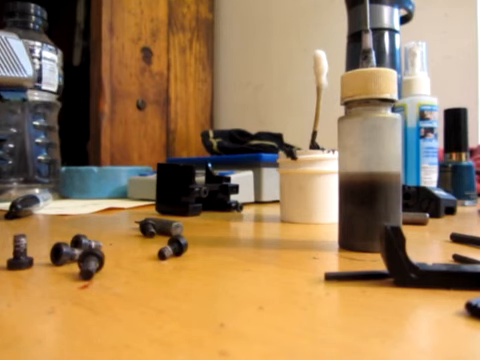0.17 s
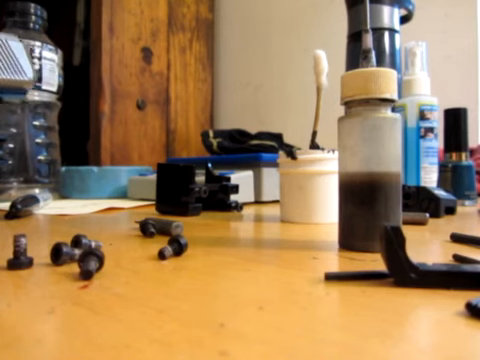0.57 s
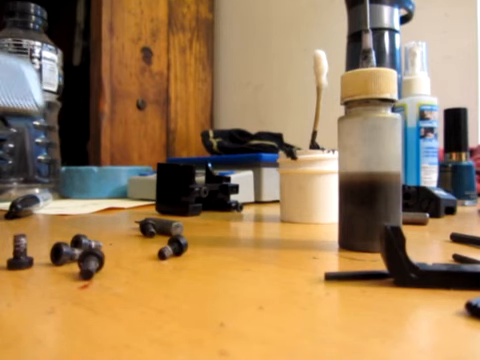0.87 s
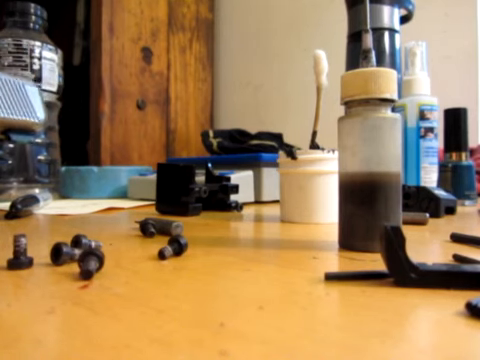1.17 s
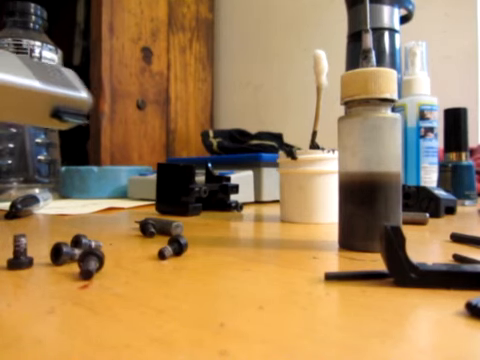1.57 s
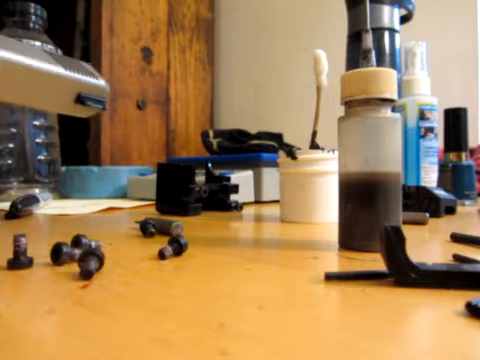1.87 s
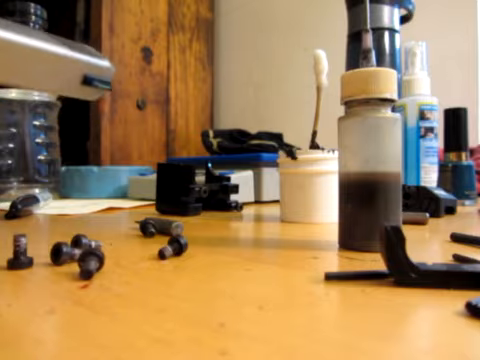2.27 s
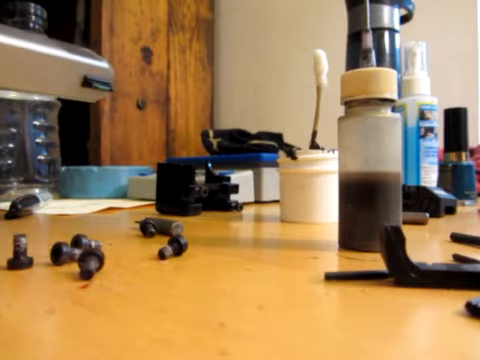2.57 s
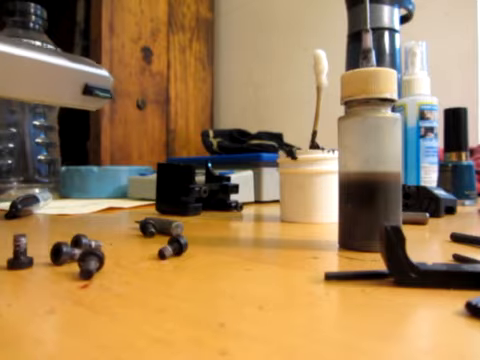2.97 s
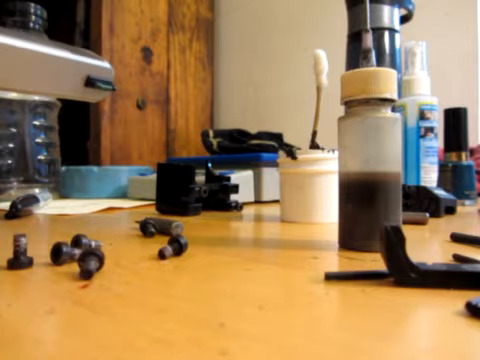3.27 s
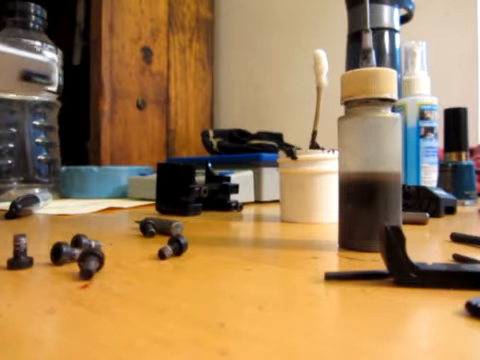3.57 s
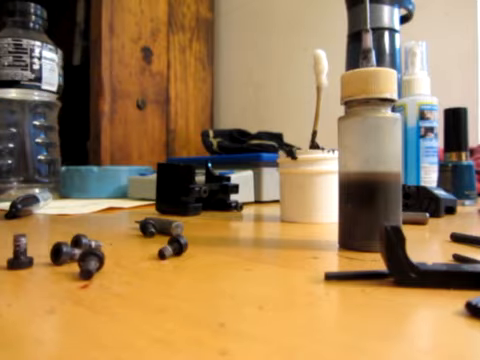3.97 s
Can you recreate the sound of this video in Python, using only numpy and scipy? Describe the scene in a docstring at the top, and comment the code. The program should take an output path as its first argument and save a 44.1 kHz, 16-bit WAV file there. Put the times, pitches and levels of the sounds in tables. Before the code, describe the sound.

Dry, close steel sounds over a wooden workbench: one bright crack, a pause with faint swishes, a hollow knock and fading taps on wood, then muffled bumps to the right. Several mid-pitched clicks follow, some with a brief ring. A sharp clack leads to a grinding slide and a rapid burst of hard clicks. Short room reflections, soft rumble, very faint high whine.

```python
"""Pistol check over a workbench

A pistol is handled over a wooden bench in a small room, close by and left of a pair of microphones.
A catch snaps; steel parts click, slide and clack in a quick run; something knocks and rocks on the bench.
Dull bumps and two swishes come from farther off, over quiet room tone and a faint whine. Bursts of noise
act as contact forces and set resonant objects ringing; reflections and a diffuse tail place them."""
import sys
import numpy as np
from scipy import signal
from scipy.fft import rfft, irfft
from scipy.io import wavfile
from scipy.ndimage import uniform_filter1d

SR = 44100
rng = np.random.default_rng(int(sys.argv[2]) if len(sys.argv) > 2 else 0)


def to_wav(sig):
    """Store sig (one row per channel, or 1-D mono) as 16-bit WAV at the path in sys.argv[1].

    Samples outside -1..1 are clipped; the rate is SR.
    """
    pcm = np.clip(np.atleast_2d(sig), -1, 1) * 32767
    pcm = np.round(pcm).astype(np.int16)
    wavfile.write(sys.argv[1], SR, pcm.T)  # frames by channels


N = 182441  # length of the scene in samples

# Band edges in Hz; a sound with fewer bands merges the upper ones.
BAND_EDGES = [30, 1000, 4000, 8000, 12000, 16000]

# Room tone spectrum. Each row: frequency in Hz, relative level in dB.
ROOM_TONE_COLOUR = [(20, -16), (64, 3.5), (87, -2.5), (118, 0.5), (286, -5), (420, -6.5), (1170, -12),
                    (4100, -25), (5500, -24.5), (9300, -32.5), (10600, -48), (15000, -103)]
# Room tone as the hands move. Each row: time in seconds, level in dB.
ROOM_TONE_LEVEL = [(0, -58.5), (.8, -61), (1.75, -54.5), (2.9, -51), (3.7, -49), (4.14, -61)]
# Decay of the small room. Each row: frequency in Hz, time to fall by 60 dB in seconds.
ROOM_DECAY = [(100, 0.14), (400, 0.25), (1500, 0.33), (5000, 0.3), (10000, 0.27), (16000, 0.041)]
# Paths to the left, then the right microphone, straight and off the bench top.
# Each path: delay in ms, gain as a factor.
MIC_PATHS = [
    [(0, 1.15), (.33, .15)],
    [(.136, .8), (.66, -.12)],
]
# The right microphone's colour for sounds from the left. Each row: frequency in Hz, gain in dB.
RIGHT_COLOUR = [(150, 6.5), (450, -2.5), (1100, -7), (2500, -3.5), (3800, 8.5), (5200, 0.5), (8000, -10),
                (13000, 11)]

# A faint electrical whine. Each row: start in seconds, level at the left microphone in dB.
WHINE_STARTS = [(0.19, -78), (1.12, -78), (2.028, -76.5), (2.96, -71.5), (4.05, -81)]
WHINE_HZ, WHINE_LENGTH_S = 5200, 0.25
WHINE_OCTAVE_DB, WHINE_RIGHT_DB = -15.5, 7.5  # octave against the tone, right against left

# Swishes farther off. Each row: start in seconds, length in seconds, relative level in dB.
SWISHES = [(0.464, 0.065, -51), (0.73, 0.054, -44)]
SWISH_BASS_DB, SWISH_TREBLE_DB, SWISH_AIR_DB = -8.5, -2.5, -3  # against the middle band
# A hollow note in the second swish. Each row: time in seconds, relative level in dB, pitch in Hz.
HOLLOW_CURVE = [(0.734, -41, 760), (0.767, -34.5, 770), (0.795, -66, 760), (0.805, -42, 795),
                (0.827, -59, 770), (0.85, -42, 750)]

# Dull bumps farther off. Each row: start in seconds, relative level in dB, length in seconds,
# fade time in seconds, middle band against the bass in dB, hollow note in Hz.
BUMPS = [(1.848, -28, 0.091, 0.037, -18.5, 600), (2.001, -44.5, 0.033, 0.01, -15, 630),
         (2.082, -33.5, 0.076, 0.047, -16, 550), (3.097, -32, 0.074, 0.034, -11.5, 286),
         (3.212, -26, 0.091, 0.029, -13.5, 580)]
# Broad colour of the bumps. Each row: frequency in Hz, gain in dB.
BUMP_COLOUR = [(60, -57), (150, -18), (245, -2.5), (380, -12), (620, -12.5), (1100, -11.5), (1700, -16.5),
               (4000, -26.5), (8000, -31), (10500, -46.5), (13000, -82)]
BUMP_TREBLE_DB = -28  # against the bass

# Knocks on the bench top. Each row: start in seconds, relative level in dB,
# everything above the bass against the bass in dB, note of the spot in Hz.
KNOCKS = [(1.325, -39, -7, 418), (1.339, -34.5, -21, 640), (1.379, -27, -15.5, 350),
          (1.3849, -22.5, -12.5, 327), (1.4179, -13, -5.5, 686), (1.425, -20, -26, 233),
          (1.4518, -22.5, -7.5, 750), (2.547, -39.5, -11, 456)]
# Broad colour of a blow on the bench. Each row: frequency in Hz, gain in dB.
BENCH_COLOUR = [(40, -17), (100, 0), (160, -4.5), (250, 0), (450, -3), (850, -7.5), (1200, -17.5),
                (3000, -30), (6000, -38), (11000, -62), (15000, -104)]
# Resonances of the bench. Each row: frequency in Hz, width in Hz, relative strength in dB.
BENCH_MODES = [(250, 29, -25), (373, 32, 5.5), (516, 52, -3), (798, 105, 6.5), (1500, 190, 0),
               (1760, 350, 1), (2370, 90, -9)]
KNOCK_LAG_S = 0.0014  # how late 315 Hz arrives after the treble; lower notes lag more
# The knocked thing rocks to rest in even, softer taps, each weaker than the last.
ROCK_START_S, ROCK_PERIOD_S, ROCK_LAG_S = 1.509, 0.0502, 0.00372
ROCK_DB, ROCK_LOSS_DB, ROCK_UPPER_DB = -29, 4, -16.5  # relative level, loss per tap, above 1 kHz against bass
# It drags over the bench just before the main knock.
DRAG_START_S, DRAG_LENGTH_S, DRAG_DB, DRAG_HZ = 1.381, 0.046, -39, 144

# Broad colour of a steel contact. Each row: frequency in Hz, gain in dB.
CONTACT_COLOUR = [(60, -11.5), (200, -11), (450, -0.5), (1000, 1), (1900, 5), (2900, 7), (3900, 1.5),
                  (5800, -3.5), (8000, -8.5), (10700, -19), (12300, -33), (16000, -56)]
# Resonances of the pistol. Each row: frequency in Hz, width in Hz, relative strength in dB.
FRAME_MODES = [(1070, 160, -2), (1690, 35, -2), (1728, 30, 0), (1784, 35, -3), (2025, 55, 1),
               (2129, 40, -3), (2470, 50, -2), (2614, 35, 0), (3071, 45, -2), (3184, 45, -1),
               (5470, 150, 1), (5730, 90, -4), (6680, 200, -4), (8200, 300, -5), (9750, 300, -2),
               (11100, 300, -4)]
# Hard contacts are bright and low-ringing parts carry more bass. Rows for bass, treble, air and the very top.
# Each row: level in dB against the middle band, dB per dB of hardness, dB per octave above MID_PART_HZ.
STEEL_BANDS = [(-1.5, 0.11, -7.5), (-7, 1.52, 2), (-24.5, 1.99, 3), (-44.5, 4.5, 4)]
MID_PART_HZ = 2000
PART_WIDTH = .14  # width of a gripped part's resonance, as a share of its pitch
FREE_DB_PER_OCTAVE = 6  # how much more strongly a part rings, per octave above MID_PART_HZ

# A jolted part rings on. Each row: start in seconds, relative level in dB, tilt of its modes in dB per octave.
PINGS = [(2.004, -47.5, -12), (2.8246, -31.5, -6)]
# Modes of that part. Each row: frequency in Hz, width in Hz, relative strength in dB.
PING_MODES = [(1696, 26, 0), (2552, 55, -3), (2678, 50, -3)]
# Short strokes of steel on steel. Each row: start in seconds, length in seconds, relative level in dB,
# hardness of the contact in dB, ring in Hz.
RUBS = [(0, 0.064, -72.5, 5.5, 3900), (1.106, 0.041, -65.5, 0, 5710), (1.325, 0.032, -57.5, 4, 590),
        (1.392, 0.04, -49.5, -2, 1580), (2.266, 0.072, -65, 3.5, 4600), (2.802, 0.019, -47.5, -20, 2550),
        (3.401, 0.056, -56, 0, 6900), (3.492, 0.034, -51, 2, 1980), (3.741, 0.03, -40, 2, 1470),
        (3.813, 0.066, -36, 5, 1600), (3.871, 0.028, -43.5, 7, 2210)]
# The slide is drawn back. Each row: time in seconds, relative level in dB, hardness in dB, ring in Hz.
SLIDE_CURVE = [(3.545, -49, 8.5, 2700), (3.565, -41, 3, 2870), (3.582, -37.5, 1, 3050),
               (3.617, -53, 6.5, 3100), (3.645, -49, 5, 2600), (3.663, -38, 3.5, 2340),
               (3.7, -41.5, 2.5, 2070), (3.731, -36.5, 5, 2200), (3.764, -41, 6, 1840),
               (3.797, -38, 2.5, 1820)]
# Resonances of the slide's rails. Each row: frequency in Hz, width in Hz, strength in dB.
RAIL_MODES = [(2740, 130, 1), (3360, 110, 5)]
# A sprung catch slips, snaps home and rebounds.
# Each row: start in seconds, relative level in dB, chatter time in ms.
SNAPS = [(0.288, -30.5, 1.3), (0.291, -11.5, 2.1), (0.2936, -17.5, 1.2)]
# Ring of the catch. Each row: frequency in Hz, width in Hz, strength in dB.
CATCH_MODES = [(2900, 100, 3.5), (3800, 200, 1), (6350, 320, 4.5), (9800, 300, 2.5), (10400, 270, 3.5)]
# Broad colour of the snap. Each row: frequency in Hz, gain in dB.
SNAP_COLOUR = [(60, -12.5), (200, -11), (700, -6.5), (1100, -2), (2200, -4), (3500, 2.5), (6500, 2),
               (8200, 1), (10000, -3.5), (12500, -4.5), (16000, -24)]
SNAP_RISE_S = 0.0004
# Steel meeting steel. Each row: time in seconds, relative level in dB, hardness of the contact in dB,
# ring of the struck part in Hz, chatter time in ms, extra bass weight in dB, relative strength of the ring in dB.
CLICKS = [(0.389, -37, 1.5, 4230, 3, -22, 1), (1.386, -35.5, -3, 1580, 1.1, 8, 14),
          (2.4642, -33.5, 0.5, 4730, 5.1, 12.5, 5), (2.6284, -21.5, 0, 2660, 2.5, 2.5, -5),
          (2.634, -24, -3, 1740, 2.3, -3, 2), (2.6384, -19.5, -2, 2500, 0.48, -7, -2),
          (2.818, -32.5, -8, 2600, 1.1, -1, -2), (2.8237, -22.5, -8.5, 2600, 1.1, -1.5, 6),
          (2.952, -41, 1.5, 596, 0.75, -2.5, 16), (2.9881, -20.5, 3, 1000, 3.3, -1, 2.5),
          (2.993, -25.5, -7, 1560, 3.3, -6, 7), (3.054, -30, -15, 2700, 1.2, 3, -19),
          (3.4788, -18.5, 4, 1880, 0.83, -0.5, -2.5), (3.516, -30, 0, 2680, 4, -2, -3),
          (3.5288, -14.5, -2, 2680, 1.74, -2, -7), (3.6614, -20, -3, 2400, 3, -3.5, 2),
          (3.669, -25.5, 3, 2250, 1.6, -15, 17), (3.712, -33.5, 7.5, 4400, 1.2, 2.5, -12),
          (3.7644, -28.5, -15, 1720, 1.5, 11.5, -1), (3.7699, -25, -12, 1730, 1.2, 1.5, -0.5),
          (3.803, -17.5, 3.5, 2130, 1.8, -3, -4.5), (3.805, -12.5, 6.5, 2050, 0.51, -3.5, 6.5),
          (3.8182, -8.5, -1, 2480, 1.3, -10, -0.5), (3.8235, -21.5, -8.5, 2000, 1.5, -1, -1),
          (3.8311, -17.5, 5.5, 5550, 1.3, -4, 7.5), (3.8432, -14.5, -4, 1850, 1.4, -4.5, 6),
          (3.847, -18.5, 6, 1095, 1.8, -4.5, 14), (3.8573, -22, -6, 900, 1.2, -1.5, 7),
          (3.8648, -14.5, 1, 1750, 1.0, -9.5, 10), (3.8667, -12.5, -14, 2050, 3, -18, 13),
          (3.895, -30, 8, 5700, 1.2, -5, -4)]

EDGE_HZ = 16000  # upper edge of the recorder's band


def amp(db):
    """Decibels to gain."""
    return 10 ** (np.asarray(db) / 20)


def unit(x):
    """Scales to unit energy."""
    return x / np.sqrt(np.sum(x ** 2) + 1e-20)


def read(points, hz):
    """Reads a table on a log-frequency axis."""
    f, value = np.transpose(points)
    return np.interp(np.log(hz + 1), np.log(f + 1), value)


def add(mix, s, sound):
    """Mixes a sound in at time s."""
    part = mix[max(round(s * SR), 0):][:len(sound)]
    part += sound[:len(part)]


def follow(curve, size):
    """Each column of a control curve, sample by sample from its first point."""
    s, *columns = np.transpose(curve)
    times = s[0] + np.arange(size) / SR
    return [np.interp(times, s, column) for column in columns]


def body(colour, size=2048):
    """Causal, minimum-phase impulse response with the broad colour of an object."""
    hz = abs(np.fft.fftfreq(2 * size, 1 / SR))
    log_gain = np.log(amp(read(colour, hz)))
    spectrum = np.exp(np.conj(signal.hilbert(log_gain)))
    return irfft(spectrum[:size + 1])[:size]


def even(x, span_hz):
    """Levels the broad humps and gaps of a random burst; its grain and decay stay."""
    power = uniform_filter1d(abs(rfft(x)) ** 2, size=max(round(span_hz * len(x) / SR), 1))
    inverse_db = -10 * np.log10(abs(power) + 1e-12)
    colour = np.column_stack([np.fft.rfftfreq(len(x), 1 / SR), inverse_db])
    return unit(signal.fftconvolve(x, body(colour))[:len(x)])


def ring(x, modes, gain_db=0, size=6000):
    """Adds ringing modes to a sound; the narrower a mode, the longer it lasts."""
    t, response = np.arange(size) / SR, np.zeros(size)
    for hz, width, db in modes:
        gain = amp(db + gain_db) * 2 * np.pi * width / SR
        response += gain * np.exp(-np.pi * width * t) * np.cos(2 * np.pi * hz * t)
    response[0] += 1  # the sound itself
    return signal.fftconvolve(x, response)


def resonate(x, hz, width_hz):
    """A resonance of gain 1 that follows the curve hz."""
    turn = np.exp(2j * np.pi * np.cumsum(hz) / SR)
    r = np.exp(-np.pi * width_hz / SR)
    # shift the pitch down to zero, smooth, shift back
    return 2 * (turn * signal.lfilter([1 - r], [1, -r], x / turn)).real


def excite(force, response, levels_db):
    """A force drives an object; the levels set the energy in each band, from the bass up."""
    sound = signal.fftconvolve(force, response)
    out = np.zeros(len(sound))
    edges = BAND_EDGES[:len(levels_db)] + BAND_EDGES[-1:]
    for k, db in enumerate(levels_db):
        bandpass = signal.butter(3, edges[k:k + 2], "band", fs=SR, output="sos")
        band = signal.sosfilt(bandpass, sound)
        out += (-1) ** k * amp(db) * unit(band)  # neighbouring bands in opposite sign
    return out


def chatter(fade_s, rise_s, span_hz, size=2048):
    """An impact: a quickly dying, broadband flurry of tiny contacts."""
    t = np.arange(size) / SR
    envelope = np.exp(-t / max(fade_s, 1e-4)) * (1 - np.exp(-(t / rise_s) ** 2))
    return even(rng.standard_normal(size) * envelope, span_hz)


def slips(length_s, grain_db, taper=0.31):
    """The force of sliding: a stream of small slips of uneven size."""
    size = int(length_s * SR)
    slip_size = amp(grain_db * np.minimum(rng.exponential(1, size), 4))
    force = rng.standard_normal(size) * slip_size
    return even(force, span_hz=205) * signal.windows.tukey(size, taper)


def diffuse(size, alike_hz=800):
    """Noise from all directions: nearly independent at the two microphones, a trace alike in the bass."""
    a, b = rfft(rng.standard_normal((2, size)))
    alike = 0.018 / (1 + (np.fft.rfftfreq(size, 1 / SR) / alike_hz) ** 2)
    return irfft(np.array([a, alike * a + np.sqrt(1 - alike ** 2) * b]), size)


def room_tone():
    """Low rumble and faint hiss: coloured noise from all around, rising a little with the handling."""
    colour = amp(read(ROOM_TONE_COLOUR, np.fft.rfftfreq(N, 1 / SR)))
    noise = irfft(rfft(diffuse(N, alike_hz=486)) * colour, N)
    level = amp(np.interp(np.arange(N) / SR, *np.transpose(ROOM_TONE_LEVEL)))
    return np.sqrt(2 * N) * unit(noise) * level


def whine():
    """A thin electrical tone with its octave, switching on and off, stronger on the right."""
    t, gate = np.arange(N) / SR, np.zeros(N)
    for start, db in WHINE_STARTS:
        gate += amp(db) * ((t > start) & (t < start + WHINE_LENGTH_S))
    gate = uniform_filter1d(gate, size=300)  # soft switching, 7 ms
    tone = np.sin(2 * np.pi * WHINE_HZ * t)
    tone += amp(WHINE_OCTAVE_DB) * np.sin(2 * np.pi * 2 * WHINE_HZ * t)
    return amp([[0], [WHINE_RIGHT_DB]]) * gate * tone


def swishes(grain_db=-8.5):
    """Smooth rubbing on something that does not ring: a stream of slips with a broad colour only."""
    out, plain = np.zeros(N), body(CONTACT_COLOUR)
    colour = np.array([SWISH_BASS_DB, 0, SWISH_TREBLE_DB, SWISH_AIR_DB])
    for s, length, db in SWISHES:
        force = slips(length, grain_db, taper=0.34)
        add(out, s, np.sqrt(length * SR) * excite(force, plain, db + colour))
    return out


def hollow(level_db=2, width_hz=420):
    """Rubbing noise in one low resonance, passed twice: a short, hollow note."""
    out, start = np.zeros(N), HOLLOW_CURVE[0][0]
    size = int((HOLLOW_CURVE[-1][0] - start) * SR)
    db, hz = follow(HOLLOW_CURVE, size)
    noise = even(rng.standard_normal(size), span_hz=60)
    note = resonate(resonate(noise, hz, width_hz), hz, width_hz)
    level = amp(level_db + db) * np.sqrt(size) * signal.windows.tukey(size, .1)
    add(out, start, level * unit(note))
    return out


def bumps(level_db=26, note_db=-2, note_width_hz=130, release_s=0.024, size=8192):
    """Soft, drawn-out blows with little treble, a low boom and a hollow note; each sags, then stops."""
    out, t = np.zeros(N), np.arange(size) / SR
    dull = ring(body(BUMP_COLOUR), [(236, 19, -6), (690, 58, -5.5)])  # Hz, width Hz, dB
    for s, db, length, fade_s, middle_db, hz in BUMPS:
        release = np.clip((length - t) / release_s, 0, 1)
        force = even(chatter(fade_s, rise_s=0.0032, span_hz=70, size=size) * release, span_hz=70)
        noted = ring(dull, [(hz, note_width_hz, note_db)])
        levels = level_db + db + np.array([0, middle_db, BUMP_TREBLE_DB])
        add(out, s, excite(force, noted, levels))
    return out


def drag(grain_db=3, width_hz=90, boom_db=5, upper_db=-20):
    """A short judder of slips over the bench top, which booms."""
    out, top = np.zeros(N), ring(body(BENCH_COLOUR), [(DRAG_HZ, width_hz, boom_db)])
    sound = excite(slips(DRAG_LENGTH_S, grain_db), top, [DRAG_DB, DRAG_DB + upper_db])
    add(out, DRAG_START_S, np.sqrt(DRAG_LENGTH_S * SR) * sound)
    return out


def bend(lag_s, size=4096):
    """Bending waves in the bench top: the bass travels slower, so each knock chirps down."""
    hz = np.fft.rfftfreq(size, 1 / SR)
    delay = 0.000836 + lag_s * np.maximum(np.sqrt(1500 / (hz + 60)) - 1, 0)
    return irfft(np.exp(-2j * np.pi * np.cumsum(delay) * SR / size))[:size // 2]


def knocks(level_db=17, ring_db=-1, spot_db=3, spot_width=0.42, count=3):
    """Something knocks on the bench top, each spot with its own dull note, then rocks to rest."""
    out, wood = np.zeros(N), ring(body(BENCH_COLOUR), BENCH_MODES, ring_db)
    for s, db, upper_db, hz in KNOCKS:
        spot = ring(wood, [(hz, spot_width * hz, spot_db)])
        add(out, s, excite(bend(KNOCK_LAG_S), spot, level_db + db + np.array([0, upper_db])))
    tap = excite(bend(ROCK_LAG_S), wood, level_db + ROCK_DB + np.array([0, ROCK_UPPER_DB]))
    for k in range(count):
        add(out, ROCK_START_S + k * ROCK_PERIOD_S, amp(-k * ROCK_LOSS_DB) * tap)
    return out


def steel_levels(db, hardness_db, hz):
    """Band levels, from the bass up, for a contact of given hardness on a part that rings at hz."""
    octaves = np.log2(hz / MID_PART_HZ)
    bass, *upper = (usual + by_hardness * hardness_db + by_pitch * octaves
                    for usual, by_hardness, by_pitch in STEEL_BANDS)
    return [db + band for band in (bass, 0, *upper)]


def gripped(frame, hz, gain_db):
    """One part rings on the frame; small, high parts ring more strongly than big ones held in the hand."""
    freedom_db = FREE_DB_PER_OCTAVE * max(np.log2(hz / MID_PART_HZ), 0)
    return ring(frame, [(hz, PART_WIDTH * hz, gain_db + freedom_db)])


def pings(level_db=1, rise_s=.001, size=8000):
    """A jolted part, likely the barrel, rings on in decaying sines; a soft touch favours its lowest mode."""
    out, t = np.zeros(N), np.arange(size) / SR
    attack = 1 - np.exp(-(t / rise_s) ** 2)
    for s, db, tilt_db in PINGS:
        for hz, width, mode_db in PING_MODES:
            gain = amp(level_db + db + mode_db + tilt_db * np.log2(hz / PING_MODES[0][0]))
            decay = np.exp(-np.pi * width * t)
            add(out, s, gain * attack * decay * np.sin(2 * np.pi * hz * t))
    return out


def rubs(grain_db=6.5, frame_db=1, part_db=3):
    """Sliding parts set the frame ringing with streams of small slips."""
    out, steel = np.zeros(N), ring(body(CONTACT_COLOUR), FRAME_MODES, frame_db)
    for s, length, db, hardness_db, hz in RUBS:
        part = gripped(steel, hz, part_db)
        sound = excite(slips(length, grain_db), part, steel_levels(db, hardness_db, hz))
        add(out, s, np.sqrt(length * SR) * sound)
    return out


def slide(level_db=-4.5, grain_db=7.5, frame_db=-2, part_db=7, width_hz=350, bass_db=-3):
    """The slide grinds along its rails; its ring rises at first, then sinks as it is drawn back."""
    start = SLIDE_CURVE[0][0]
    length = SLIDE_CURVE[-1][0] - start
    force = slips(length, grain_db, taper=0.016)
    steel = ring(ring(body(CONTACT_COLOUR), FRAME_MODES, frame_db), RAIL_MODES)
    db, hardness_db, hz = follow(SLIDE_CURVE, len(force) + len(steel) - 1)
    force = force + amp(part_db) * resonate(force, hz[:len(force)], width_hz)
    bass, *upper = steel_levels(level_db + db, hardness_db, hz)
    out = np.zeros(N)
    add(out, start, np.sqrt(length * SR) * excite(force, steel, [bass + bass_db, *upper]))
    return out


def snap(level_db=15, ring_db=0):
    """A sprung catch slips, snaps home and rebounds: a full, dry crack with a short high ring."""
    out, catch = np.zeros(N), ring(body(SNAP_COLOUR), CATCH_MODES, ring_db)
    for s, db, ms in SNAPS:
        force = chatter(ms / 1000, SNAP_RISE_S, span_hz=403)
        add(out, s, amp(level_db + db) * unit(signal.fftconvolve(force, catch)))
    return out


def strike(fade_s, strike_db, rise_s=0.00047):
    """Steel on steel: one sharp blow amid a short chatter."""
    force = chatter(fade_s, rise_s, span_hz=450)
    add(force, rise_s, np.array([amp(strike_db)]))
    return even(force, span_hz=300)


def clicks(level_db=14.0, frame_db=-2, strike_db=-5, late_s=0.00018, ring_per_hardness=-0.25):
    """Each catch or stop strikes one part, which chatters; softer contacts ring the whole frame more."""
    out, contact = np.zeros(N), body(CONTACT_COLOUR)
    for s, db, hardness_db, hz, ms, weight_db, part_db in CLICKS:
        frame = ring(contact, FRAME_MODES, frame_db + ring_per_hardness * hardness_db)
        part = gripped(frame, hz, part_db)
        bass, *upper = steel_levels(level_db + db, hardness_db, hz)
        add(out, s + late_s, excite(strike(ms / 1000, strike_db), part, [bass + weight_db, *upper]))
    return out


def near(x):
    """Sound from close by on the left: it reaches the right microphone later and weaker."""
    left, right = (sum(gain * np.pad(x, (round(ms * SR / 1000), 0))[:N] for ms, gain in paths)
                   for paths in MIC_PATHS)
    return np.array([left, signal.fftconvolve(right, body(RIGHT_COLOUR))[:N]])


def clutter(x, fade_s=0.0098, gap_s=0.00075, change_s=0.025, size=3000, count=11):
    """Early reflections off the bench, the bottles and the wall behind, as short bursts of diffuse taps.
    Their patterns crossfade in a repeating cycle, standing for the moving hands."""
    t, out = np.arange(size) / SR, np.zeros((2, N))
    envelope = np.exp(-t / fade_s) * (1 - np.exp(-(t / gap_s) ** 2))
    for k in range(count):
        taps = np.array([even(ear, span_hz=220) for ear in diffuse(size) * envelope])
        phase = (np.arange(N) / SR / change_s - k) % count
        share = np.sin(np.pi / 2 * np.minimum(phase, 2))  # silent outside its own turn
        out += signal.oaconvolve((share * x)[None], np.sqrt(2) * unit(taps), axes=1)[:, :N]
    return out


def room(x, build_s=0.0077):
    """The diffuse tail of the small room: noise that builds up, then decays at a rate set by frequency."""
    hz, t, z = signal.stft(diffuse(SR), SR, nperseg=256)
    z = z * amp(-60 * t / read(ROOM_DECAY, hz)[:, None])
    tail = signal.istft(z, SR, nperseg=256)[1]
    tail *= 1 - np.exp(-np.arange(tail.shape[1]) / SR / build_s)
    return signal.fftconvolve(x[None], np.sqrt(2) * unit(tail), axes=1)[:, :N]


def scene():
    """Near sounds arrive mostly direct, far ones with more reflection; the bumps lie to the right.
    The bench top shakes both microphones almost alike."""
    tone, hum = room_tone(), whine()
    swish, note, bump = swishes(), hollow(), bumps()
    wood, ping, rub = knocks() + drag(), pings(), rubs() + slide()
    crack, steel = snap(), clicks()
    direct = near(steel + ping + amp(1.0) * crack + amp(-3.0) * rub
                  + amp(-6.0) * note + amp(-5.0) * swish)
    direct += amp([[0.0], [-1.5]]) * wood  # left, right
    direct += amp([[-5.0], [-2.5]]) * bump
    walls = clutter(amp(-4.0) * steel + crack + rub + amp(-5.0) * wood
                    + amp(-3.0) * swish + amp(-3.5) * bump + amp(-2.0) * note)
    late = room(amp(-12.0) * steel + amp(-22) * ping + amp(-14.5) * crack + amp(-14.5) * rub
                + amp(-10.5) * wood + amp(-5.5) * swish + amp(-10.5) * bump + amp(-7.5) * note)
    return direct + walls + late + tone + hum


def record(dry, ceiling=0.97):
    """The recorder rounds off the highest peaks, then limits the band."""
    rounded = ceiling * np.tanh(dry / ceiling)
    lowpass = signal.firwin(511, EDGE_HZ, window=("kaiser", 9), fs=SR)
    return signal.oaconvolve(rounded, lowpass[None], "same")


dry = scene()
out = record(dry)
to_wav(out)
```